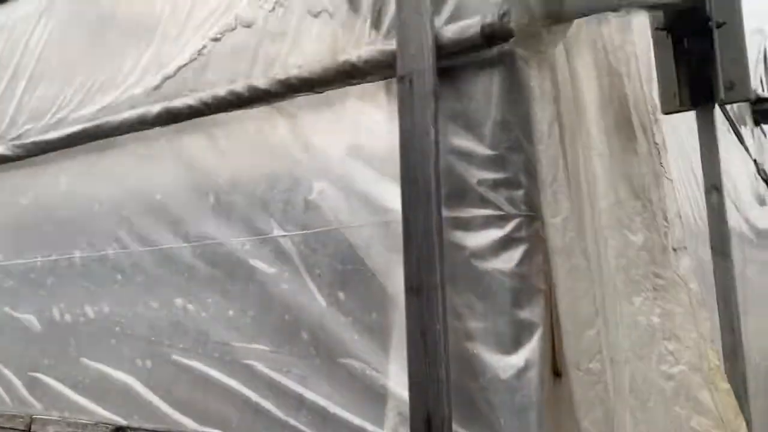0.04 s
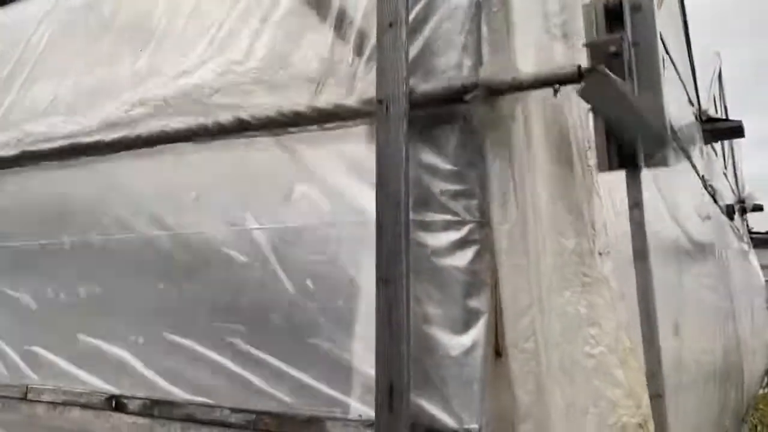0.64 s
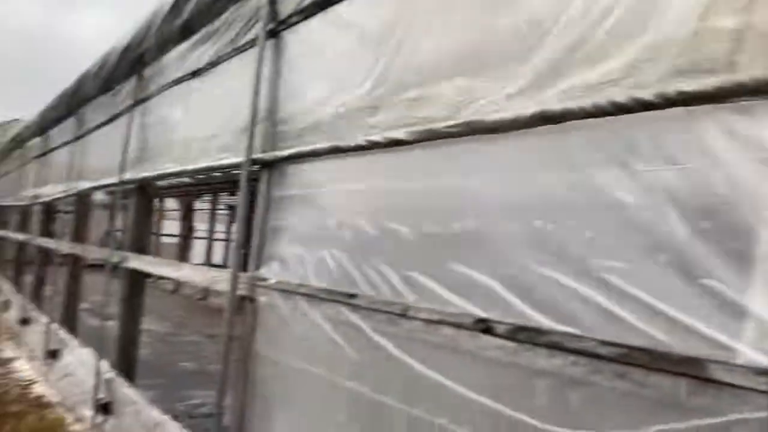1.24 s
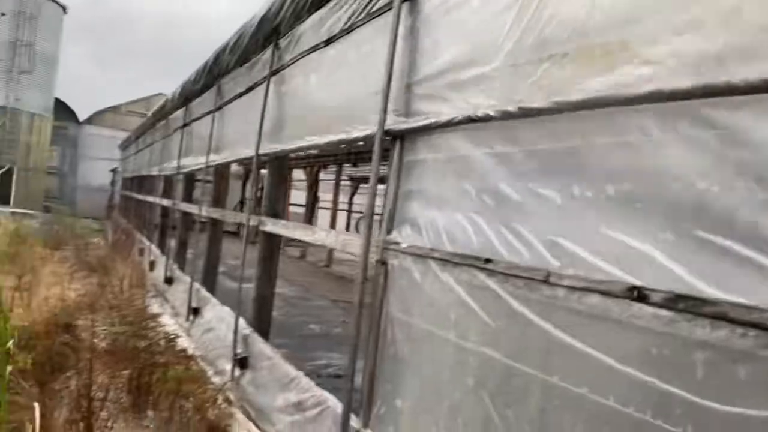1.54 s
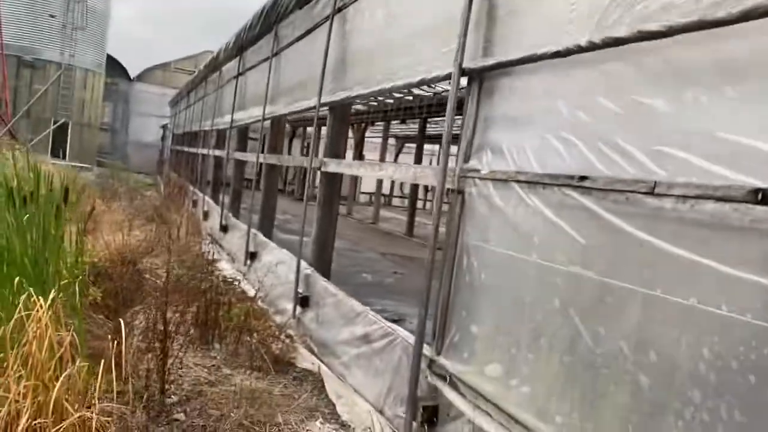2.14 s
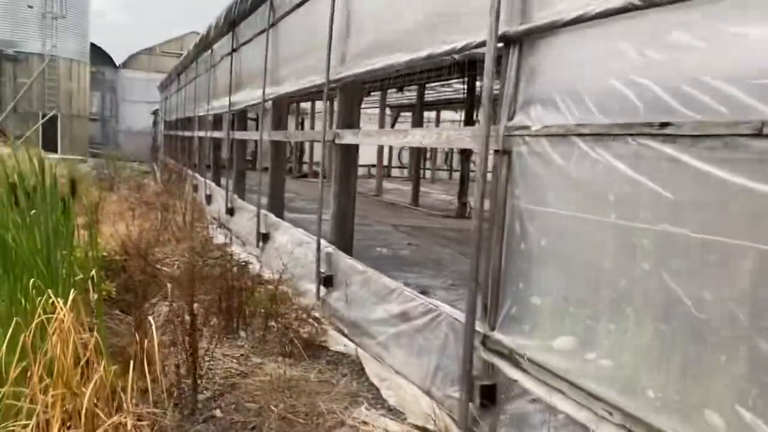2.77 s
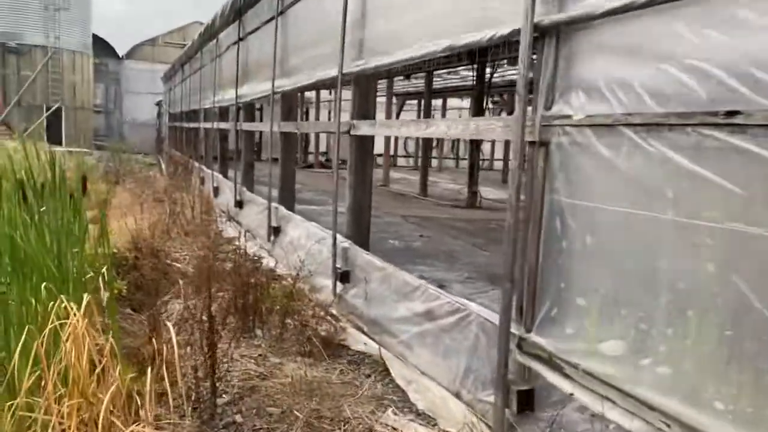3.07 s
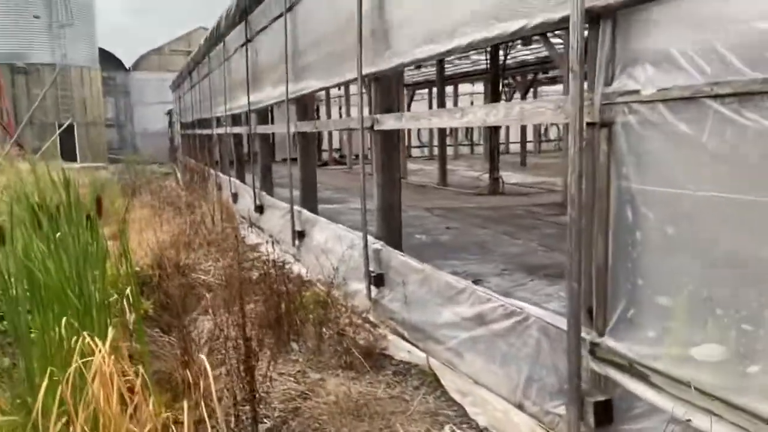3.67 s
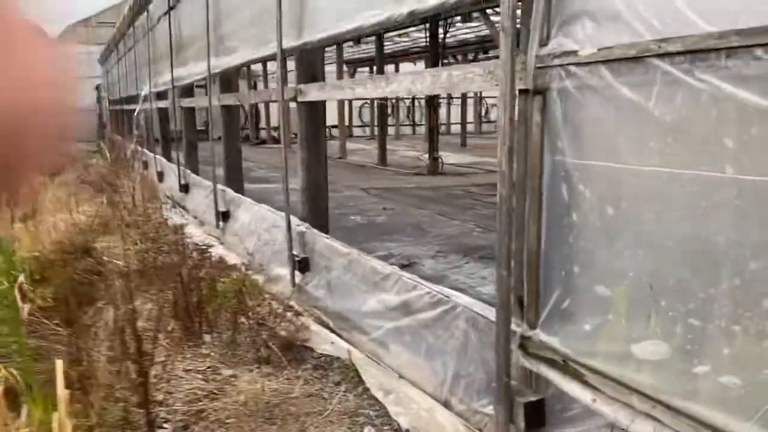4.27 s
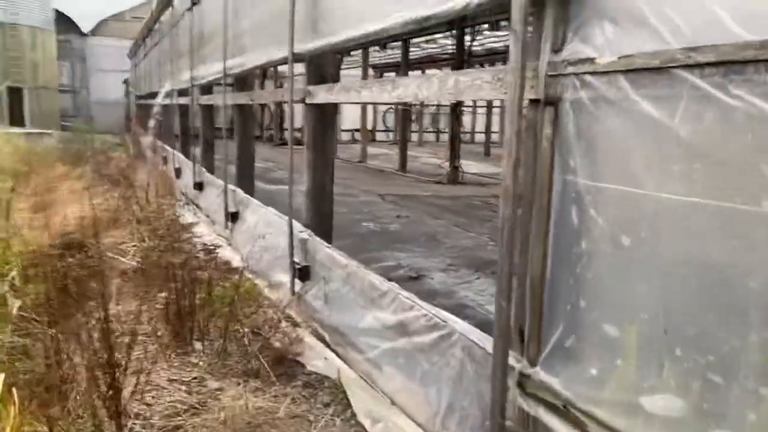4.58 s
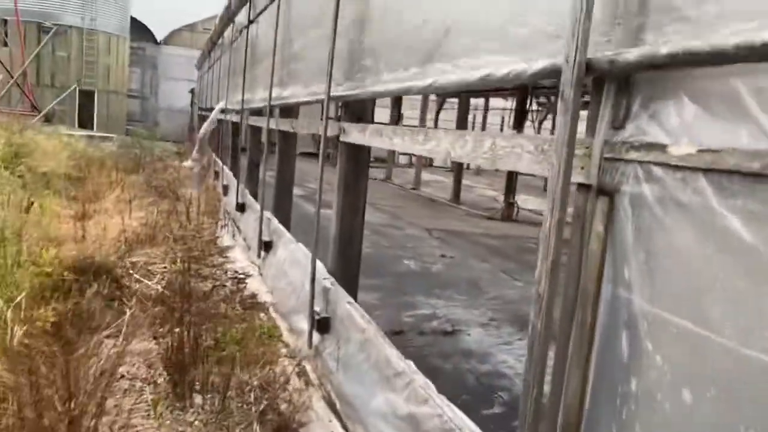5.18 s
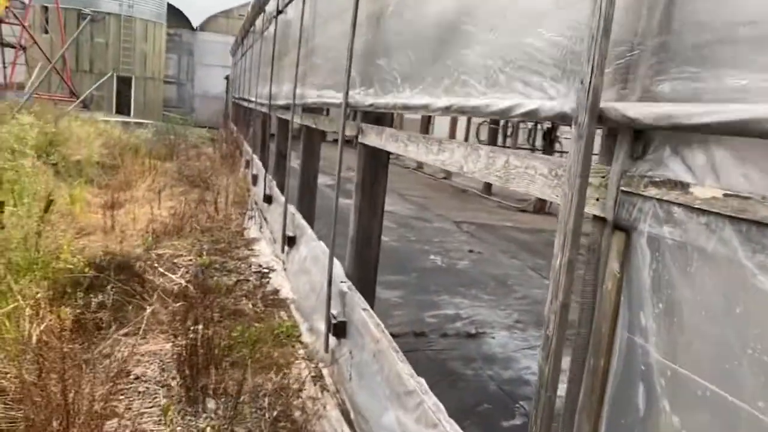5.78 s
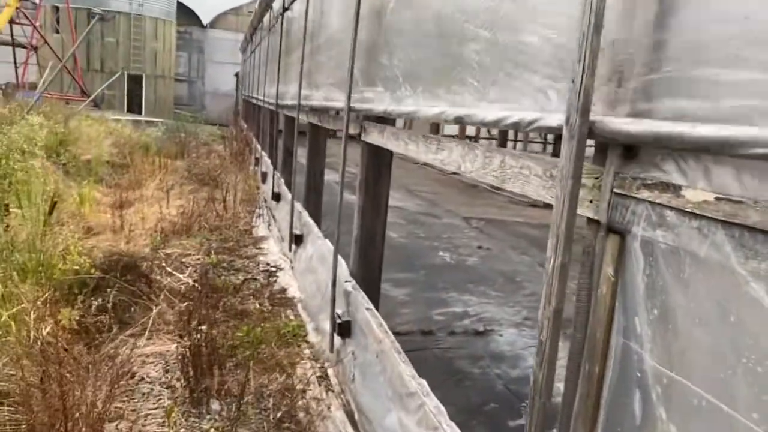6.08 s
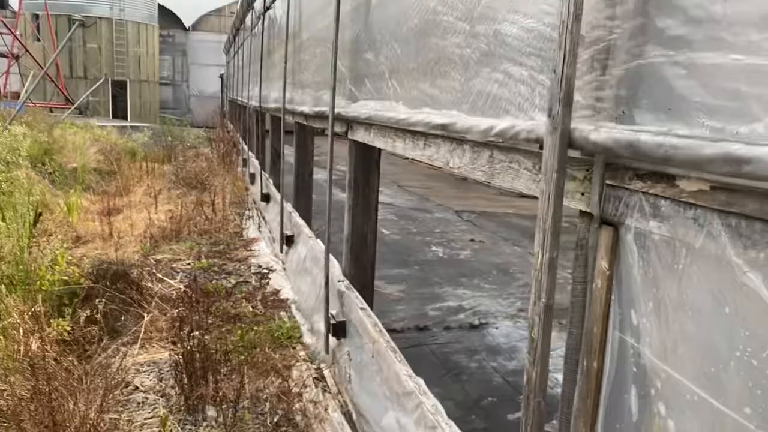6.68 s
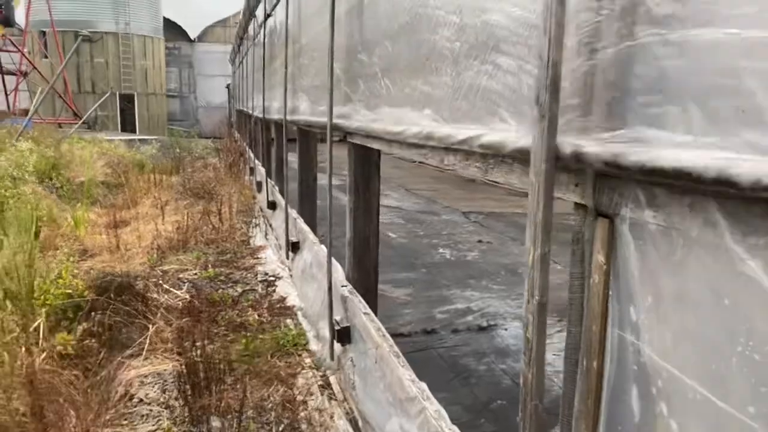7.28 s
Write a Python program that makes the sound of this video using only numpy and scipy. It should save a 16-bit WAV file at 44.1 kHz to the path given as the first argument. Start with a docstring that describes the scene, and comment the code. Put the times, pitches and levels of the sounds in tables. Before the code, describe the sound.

A rapid metallic clatter from a spinning crank gives way to uneven knocks, then quiet plastic crinkling and scraping outdoors.

```python
"""A greenhouse side curtain unrolls under its own weight and spins its hand crank, in a light wind.
For 3 s loose gears beat 7-8 times a second (lead-in, blow, rebound), ringing the gearbox and the long
steel roll pipe; the pipe chatters along the frame and the film rustles. The phone turns away from the
crank; the pipe knocks from 3 to 4.6 s. Then folds crinkle, and from 6 s the roll bumps and scrapes
over the sill."""
import sys
import numpy as np
from scipy import signal
from scipy.fft import rfft, irfft, next_fast_len
from scipy.io import wavfile
from scipy.ndimage import uniform_filter1d, map_coordinates

SR = 44100
rng = np.random.default_rng(int(sys.argv[2]) if len(sys.argv) > 2 else 0)


def generate_wav(signal):
    """Clip the signal to [-1, 1] and save it as 16-bit WAV at the path in sys.argv[1]."""
    frames = np.transpose(np.atleast_2d(signal))
    scaled = np.clip(frames, -1, 1) * 32767
    pcm = np.round(scaled).astype(np.int16)
    wavfile.write(sys.argv[1], SR, pcm)


N = 331632
TIME = np.arange(N) / SR

# gearbox modes: pitch_hz, level_db, t60_s
GEARBOX_MODES = [(571, -23, 0.1), (698, -3, 0.11), (728, 0, 0.1), (782, -9, 0.09), (888, -17, 0.08)]
# unrolling between knocks: time_s, pipe_chatter_db, film_rustle_db
UNROLLING = [(0.0, -23, -14), (.115, -25, -32), (.2, -27.5, -33), (0.38, -33.5, -31), (0.71, -28.5, -28),
             (0.98, -46, -32.5), (1.19, -36, -29), (2.14, -31, -37), (2.32, -36, -35.5), (3.2, -33, -33.5),
             (4.31, -31, -29), (4.66, -33, -37), (4.87, -38.5, -39.5), (5.08, -40, -39), (5.3, -35, -37),
             (5.75, -37, -38.5), (6.16, -31.5, -42), (6.37, -38.5, -51), (6.52, -34, -39), (6.59, -41, -50),
             (6.65, -32.5, -41), (6.7, -49, -60), (6.79, -36, -47), (7.14, -31, -43.5), (7.52, -39.5, -54)]
# gear beats: start_s, blow_db, lead_s, lead_rel_db, rebound_s, rebound_rel_db, ring_rel_db,
# grind_rel_db, tooth_crack_db
GEAR_BEATS = [(.059, -7.5, 0.029, -6.5, 0.072, -4, 4.5, -7.5, -38),
              (.214, -3.5, 0.018, -18, 0.08, -13, 0.5, -23, -19),
              (0.3649, -6, .006, -10, 0.07, -12, 3.5, -9, -12.5),
              (.501, -6.5, 0.024, -1, 0.06, -12, 5, -6.5, -13),
              (0.6328, -5.5, 0.021, -4, 0.052, -3.5, 4.5, -8, -16),
              (.762, -6.5, 0.021, -0.5, 0.05, -4.5, 8.5, -5.5, -12),
              (0.881, -5.5, 0.015, -8, 0.079, -14, 3.5, -18, -18),
              (1.0085, -3, 0.031, -13.5, 0.054, -14.5, -1, -13, -15.5),
              (1.125, -3.5, 0.025, -8, 0.069, -8, -0.5, -16, -28),
              (1.243, 0, 0.016, -21, 0.038, -27, -5, -25, -17),
              (1.3587, -3.5, 0.027, -4.5, 0.041, -9, 1, -28, -25),
              (1.473, -4.5, 0.017, -11, 0.055, -4, -4, -7, -13),
              (1.603, -4.5, 0.016, -7.5, 0.064, -12.5, 6, -5.5, -11.5),
              (1.737, -8.5, 0.015, -10, .064, -6.5, 4, -4, -15),
              (1.876, -5.5, 0.018, -6, .055, -11, 1.5, -16, -14.5),
              (2.018, -8, 0.02, -6.5, 0.051, -7.5, 2.5, -13, -17.5),
              (2.1595, -11.5, 0.025, 0, 0.061, -5, 2, -11, -31),
              (2.286, -8.5, .007, -6.5, 0.079, -9, 3.5, -22, -39),
              (2.45, -14.5, 0.023, -1, 0.066, -3.5, 5, -11, -23),
              (2.587, -9, 0.028, -8, 0.04, -9.5, 2, -27, -40),
              (2.712, -12, 0.02, 1, 0.049, -9.5, -1.5, -23, -34),
              (2.847, -9, 0.025, -4.5, 0.026, -20, -8, -21, -26)]


def undb(db):
    """Decibels to gain."""
    return np.exp(np.asarray(db) * (np.log(10) / 20))


def curves(table):
    """Columns of a timed table, one value per sample."""
    time_s, *columns = np.transpose(table)
    return [np.interp(TIME, time_s, column) for column in columns]


def unit(x, span_s=None):
    """Scale to rms 1, over the first span_s if given."""
    head = x if span_s is None else x[:int(span_s * SR)]
    return x / np.sqrt(np.mean(head ** 2) + 1e-18)


def response(colour, size=2048):
    """Minimum-phase impulse response from rows of freq_hz, level_db."""
    hz, db = np.transpose(colour)
    bins_hz = np.maximum(np.fft.rfftfreq(size, 1 / SR), 1)
    bins_db = np.interp(np.log(bins_hz), np.log(hz), db)
    cepstrum = irfft(np.log(undb(bins_db)))
    cepstrum[1:size // 2] *= 2
    cepstrum[size // 2 + 1:] = 0
    return irfft(np.exp(rfft(cepstrum)))


def varied_response(colour, scatter_db, size):
    """Impulse response of a colour with each point randomly raised or lowered."""
    hz, db = np.transpose(colour)
    return response(np.transpose([hz, db + scatter_db * rng.standard_normal(len(hz))]), size)


def through(x, ir):
    """Convolve, keeping the length of x."""
    size = next_fast_len(len(x) + len(ir), True)
    spectrum = rfft(x.astype(np.float32), size) * rfft(ir.astype(np.float32), size)
    return irfft(spectrum, size)[:len(x)].astype(float)


def shelf(x, hz, db):
    """Raise or lower everything above hz."""
    low = signal.sosfiltfilt(signal.butter(3, hz, fs=SR, output="sos"), x)
    return low + undb(db) * (x - low)


def walk(rate_hz):
    """Slow random wander, rms 1."""
    hop = int(SR / rate_hz)
    steps = np.repeat(rng.standard_normal(N // hop + 1), hop)
    return unit(uniform_filter1d(steps, hop)[:N])


def add(track, start_s, sound):
    """Mix a sound into a track."""
    i = min(max(int(start_s * SR), 0), N)
    track[i:i + len(sound)] += sound[:N - i]


def crunch(t, rise_s, decay_s, tail_db, tail_s, strikes=((0, 0),)):
    """Faces meet unevenly at each strike; the frame carries on a weak shiver."""
    power = (undb(tail_db) * (1 - np.exp(-t / rise_s)) * np.exp(-t / tail_s)) ** 2
    for start_s, db in strikes:
        age_s = np.maximum(t - start_s, 0)
        power = power + (undb(db) * (1 - np.exp(-age_s / rise_s)) * np.exp(-age_s / decay_s)) ** 2
    uneven_db = 2.5 * unit(uniform_filter1d(rng.standard_normal(len(t)), size=110))
    return np.sqrt(power) * undb(uneven_db) * rng.standard_normal(len(t))


def bounces(gap_s=0.0055, step_db=-5):
    """Steel strikes three times per knock: start_s, level_db."""
    first_s, second_s = gap_s * rng.uniform(0.6, 1.4, 2)
    return [(0, 0), (first_s, step_db), (first_s + second_s, 2 * step_db)]


def ring(t, modes, rise_s, scatter_db, detune):
    """Damped modes; each blow lands elsewhere and weights them anew."""
    hz, db, t60_s = np.transpose(modes)[:, :, None]
    weight, shift, phase = rng.standard_normal((3, len(modes), 1))
    waves = np.sin(2 * np.pi * (hz * (1 + detune * shift) * t + phase))
    decay = np.exp(-np.minimum(np.log(1000) * t / t60_s, 20))
    return (undb(db + scatter_db * weight) * waves * decay).sum(0) * (1 - np.exp(-t / rise_s))


def ticks(rate_hz, decay_s, hiss, spread_db=3.5):
    """Small contacts of uneven size, each a noise burst, over a smooth rub."""
    size = undb(spread_db * np.minimum(rng.exponential(size=N), 2))
    hits = size * (rng.random(N) < rate_hz / SR)
    power = np.abs(signal.lfilter([1], [1, -np.exp(-2 / (decay_s * SR))], hits ** 2))
    return (unit(np.sqrt(power)) + hiss) * rng.standard_normal(N) / (1 + hiss)


def roaming(x, colour, scatter_db, count):
    """Recolour a sound piece by piece as the contact moves along the roll."""
    out, hop = np.zeros(N), N // count
    fade = signal.windows.hann(2 * hop, sym=False)
    padded = np.pad(x, (hop, 2 * hop))
    for start in range(0, N + hop, hop):
        piece = padded[start:start + 2 * hop]
        ir = varied_response(colour, scatter_db, size=1024)
        piece = signal.fftconvolve(piece * fade[:len(piece)], ir / np.linalg.norm(ir))
        add(out, (start - hop) / SR, piece[max(hop - start, 0):])
    return unit(out)


def blows():
    """Stray knocks and gear beats: start_s, level_db, ring_rel_db, grind_rel_db, snap_rel_db."""
    # extra gear rattles at first, then the pipe against the frame: start_s, level_db, snap_rel_db
    stray_knocks = [(0.001, -11, -2), (.141, -10, -11), (0.172, -17, 9), (0.233, -8, 9), (.489, -9, 0),
                    (.777, -15, -1), (1.231, -24, -7), (1.267, -11, 11.5), (1.83, -27, -8),
                    (2.213, -14.5, 2), (2.228, -18, 10), (2.862, -13, 6), (2.956, -12.5, 1),
                    (2.999, -20.5, 8), (3.021, -15.5, -8), (3.064, -14.5, 2), (3.102, -16, -12),
                    (3.178, -12.5, -10), (3.247, -13.5, -1), (3.255, -12.5, 6.5), (3.327, -11, -4),
                    (3.405, -12.5, -7), (3.456, -17, -5), (3.481, -12.5, -2), (3.533, -39, -7),
                    (3.565, -15.5, 5.5), (3.614, -15, -2), (3.641, -10, -9), (3.727, -18.5, 2),
                    (3.796, -11, -3), (3.884, -17, 5), (3.948, -16.5, 9.5), (4.047, -20, 11),
                    (4.099, -15, 6), (4.185, -15, 12), (4.222, -12.5, 12), (4.239, -8, 5.5), (4.33, -19, 9),
                    (4.373, -13, -5), (4.393, -10, -4), (4.474, -8.5, -2), (4.533, -15, 2), (4.554, -18, 6)]
    glance = (-0.5, -28)  # ring_rel_db, grind_rel_db
    glance_snap_db = -0.5
    rows = [(s, db, *glance, snap_db) for s, db, snap_db in stray_knocks]
    for s, db, lead_s, lead_db, rebound_s, rebound_db, ring_db, grind_db, _ in GEAR_BEATS:
        rows += [(s - lead_s, db + lead_db, *glance, glance_snap_db),  # slack closes
                 (s, db, ring_db, grind_db, 0),
                 (s + rebound_s, db + rebound_db, *glance, glance_snap_db)]  # gear falls back
    return rows


def knocks():
    """Gear and pipe knocks: dry snap, clack with steel clink, clank along the pipe, hollow gearbox."""
    # contact colours: freq_hz, level_db
    snap_colour = [(6000, -16), (7400, 3.5), (8600, -1.5), (10000, 0.5), (11000, 0), (11800, -44),
                   (13200, 0), (14200, -11), (16000, -35)]
    clack_colour = [(1800, -39), (3000, -34), (3500, -7.5), (4100, 2), (4600, -6.5), (4950, -7.5),
                    (5400, 2.5), (5800, -0.5), (6400, 2), (7400, -7), (8600, -13.5), (10500, -2),
                    (12000, -26), (16000, -31)]
    clank_colour = [(90, -24), (170, -10.5), (250, -19), (340, -7.5), (520, -1), (700, 0.5), (1000, 1.5),
                    (1420, 4.5), (1650, -0.5), (1950, -1), (2250, -11.5), (2800, -10), (3300, -9.5),
                    (4500, -30.5)]
    # modes of small crank parts and roll pipe: pitch_hz, level_db, t60_s
    clink_modes = [(3930, -54, 0.011), (4200, 8, 0.015), (4750, 19, 0.023), (5230, 13, 0.025),
                   (5870, 8, 0.012), (6820, -13, 0.011), (8000, -36, 0.015)]
    pipe_modes = [(309.5, -5.5, 0.22), (1380, -7, 0.03), (1540, -42, 0.11), (1930, 3, 0.029),
                  (1922, 12.5, 0.057), (2024, 3.5, 0.18), (2147, 6.5, 0.081), (2444, 11, 0.023),
                  (2700, -1, 0.11), (3020, -11, 0.25)]
    # mix as the phone leaves the crank for the pipe:
    # time_s, pipe_rel_db, clink_rel_db, rattle_ms, clank_rel_db, gearbox_rel_db
    balance = [(0, -55, 3, 2.8, -8, -12), (1.2, 2.5, -3.5, 1.7, -18.5, -15.5),
               (2.0, -15.5, -22, 5.3, -9.5, -16), (2.6, 1, -15, 4.1, -13.5, -13),
               (3.2, 1.5, -1, 7.3, -13.5, -26.5), (4.25, 4, -12, 12, -15.5, -44),
               (4.48, -1.5, -3, 11, -15, -28.5)]
    out, t = np.zeros(N), np.arange(SR // 7) / SR
    snap_ir, mix, chatter_db = response(snap_colour), np.array(curves(balance)), curves(UNROLLING)[0]
    for start_s, db, ring_db, grind_db, snap_rel_db in blows():
        i = max(int(start_s * SR), 0)
        pipe_db, clink_db, rattle_ms, clank_rel_db, box_rel_db = mix[:, i]
        clack_gain, clank_gain = undb(db - 14.5), undb(db + clank_rel_db)
        box_gain = undb(db + box_rel_db + ring_db)
        firm_db = 0.06 * (db - chatter_db[i] - 31)  # further above the chatter: brighter
        snap_gain = undb(db - 16 + snap_rel_db + firm_db + 2 * rng.standard_normal())
        rattle_s, strikes = rattle_ms / 1000, bounces()
        clack_ir = varied_response(clack_colour, scatter_db=3.5, size=512)
        clank_ir = varied_response(clank_colour, scatter_db=2.5, size=1024)

        snap = crunch(t, 0.0004, 0.5 * rattle_s, tail_db=-26, tail_s=0.018, strikes=strikes)
        snap = unit(through(snap, snap_ir), 0.014)
        clack = crunch(t, 0.00015, 0.7 * rattle_s, tail_db=-15, tail_s=0.025, strikes=strikes)
        clink = ring(t, clink_modes, rise_s=0.00041, scatter_db=5, detune=0.025)
        clack = unit(through(clack, clack_ir), 0.019) + undb(clink_db) * unit(clink, 0.01)
        clank = crunch(t, 0.0024, 2 * rattle_s, tail_db=-18.5, tail_s=0.067)
        pipe = ring(t, pipe_modes, rise_s=0.0002, scatter_db=5, detune=0.04)
        clank = unit(through(clank, clank_ir), 0.022) + undb(pipe_db) * unit(pipe, 0.012)
        box = unit(ring(t, GEARBOX_MODES, rise_s=0.0047, scatter_db=4, detune=0.02), 0.037)
        add(out, start_s, snap_gain * snap + clack_gain * clack + clank_gain * clank + box_gain * box)

        # teeth grind up to the blow: a reversed burst
        burst = rng.standard_normal(len(t)) * np.exp(-t / 0.0058)
        grind = clack_gain * unit(through(burst, clack_ir), 0.05)
        grind += clank_gain * unit(through(burst, clank_ir), 0.035)
        swell = grind[:np.clip(i, 1, SR // 30)][::-1]
        add(out, start_s - len(swell) / SR, undb(grind_db) * swell)
    return out


def shaking(depth_db=4.5, settle_s=0.035):
    """Gain of pipe and film: each knock shakes them, then they settle."""
    jolt, t = np.zeros(N), np.arange(SR // 5) / SR
    for start_s, *_ in blows():
        add(jolt, start_s, np.exp(-t / settle_s))
    jolt = np.minimum(jolt, 1)
    return undb(depth_db * (jolt - uniform_filter1d(jolt, size=SR // 2)))


def curtain():
    """The roll pipe chatters along the posts; stiff film crackles off it."""
    # pipe and film colours: freq_hz, level_db
    chatter_colour = [(120, -10.5), (300, -1.5), (560, -11), (715, 3.5), (830, -13.5), (1100, -9.5),
                      (1420, 2), (1550, -4.5), (1720, 3.5), (2080, 0.5), (2260, -5.5), (2750, -9.5),
                      (3400, -17.5), (5000, -22.5)]
    film_colour = [(1800, -5), (2900, 0.5), (3400, -4), (3800, 1), (4500, -3), (4950, 1), (5500, 4.5),
                   (6100, 0), (7500, 0), (10000, 2.5), (12000, -7.5), (13500, -35), (16000, -58)]
    chatter_db, film_db = curves(UNROLLING)
    contacts = ticks(rate_hz=190, decay_s=0.0068, hiss=0.13)
    chatter = roaming(contacts, chatter_colour, scatter_db=1.5, count=70)
    crackle = ticks(rate_hz=230, decay_s=0.003, hiss=0.16, spread_db=4)
    film = roaming(crackle, film_colour, scatter_db=2.5, count=90)
    return shaking() * (undb(chatter_db) * chatter + undb(film_db) * film)


def wind(breeze_db=-50.5, hush_db=-49):
    """Breeze, gusts and short eddies rumble on the phone over an open-air hush."""
    # rumble and hush colours: freq_hz, level_db
    rumble_colour = [(20, -40), (45, -1), (75, 0), (110, 1), (170, -9.5), (300, -29), (700, -32),
                     (2000, -56)]
    hush_colour = [(30, -36), (100, -1), (300, -10.5), (1000, -9), (4000, -20), (10500, -35.5),
                   (15000, -57)]
    # broad gusts: centre_s, level_db, half_width_s
    gusts = [(1.151, -45.5, 0.4), (5.93, -41.5, 0.44)]
    # eddies on the case: start_s, level_db
    eddies = [(4.668, -46), (4.799, -41.5), (5.659, -39), (5.69, -41), (5.919, -38), (5.955, -36),
              (6.038, -35), (6.21, -34.5), (6.4, -37.5), (7.442, -32.5)]
    gust_power = sum(undb(db) ** 2 * np.exp(-((TIME - s) / width_s) ** 2) for s, db, width_s in gusts)
    flow = np.sqrt(undb(breeze_db) ** 2 + gust_power)
    rumble_ir, hush_ir = response(rumble_colour), response(hush_colour)
    mid, side = (unit(through(rng.standard_normal(N), rumble_ir)) for _ in range(2))
    rumble = (mid + undb(-20) * np.array([side, -side])) * flow * undb(4.2 * walk(rate_hz=14))
    buffets, t = np.zeros(N), np.arange(SR // 5) / SR
    for start_s, db in eddies:
        eddy = through(rng.standard_normal(len(t)) * t * np.exp(-t / 0.0056), rumble_ir)
        add(buffets, start_s, undb(db) * unit(eddy, 0.04))
    left, right, common = (unit(through(rng.standard_normal(N), hush_ir)) for _ in range(3))
    return rumble + buffets + undb(hush_db) * (common + 0.5 * np.array([left, right]))


def pawl():
    """The lifted pawl flicks passing teeth: dry clicks, too light to ring the gearbox."""
    # flicks: start_s, level_db
    flicks = [(.032, -12.5), (.197, -21), (.431, -22), (.591, -29), (.72, -31), (.858, -16), (1.044, -25),
              (1.1, -30), (1.143, -17), (1.5, -28), (1.801, -17), (2.182, -30), (2.976, -27), (2.999, -23),
              (3.469, -19), (3.767, -21), (3.925, -24), (4.519, -30)]
    # flick colour: freq_hz, level_db
    colour = [(1500, -14), (3200, -16), (4400, -4), (5800, -6), (7300, 0), (8700, -3), (10300, 0),
              (11900, -16), (13400, -3), (16000, -22)]
    out, t = np.zeros(N), np.arange(SR // 20) / SR
    for start_s, db in flicks:
        burst = crunch(t, rise_s=0.0003, decay_s=0.0025, tail_db=-22, tail_s=0.008)
        click = through(burst, varied_response(colour, scatter_db=2, size=256))
        add(out, start_s, undb(db) * unit(click, 0.004))
    return out


def teeth():
    """On each main blow a steel tooth seats with a short, bright crack."""
    # crack colour: freq_hz, level_db
    colour = [(5000, -43), (10500, 11), (11800, -11), (13000, 8), (13800, 6), (15000, -8), (16000, -26)]
    out, t = np.zeros(N), np.arange(SR // 14) / SR
    for start_s, *_, crack_db in GEAR_BEATS:
        burst = crunch(t, rise_s=0.0002, decay_s=0.0025, tail_db=-26, tail_s=0.008, strikes=bounces())
        crack = through(burst, varied_response(colour, scatter_db=2.5, size=256))
        add(out, start_s, undb(crack_db) * unit(crack, 0.0033))
    return out


def handle(t60_s=0.0064):
    """The loose handle chinks in its steel socket and rings briefly."""
    # chinks: start_s, level_db, pitch_hz
    chinks = [(.0595, -20, 4060), (.269, -17, 4740), (0.4783, -15, 4390), (0.503, -8, 5020),
              (0.682, -19.5, 4340), (0.742, -17, 4680), (0.763, -11.5, 4900), (1.4755, -15, 3690),
              (3.259, -22, 4130), (3.952, -25, 2580)]
    # chink partials: pitch_ratio, level_db
    partials = [(.9, -20), (1, -4), (1.07, 6), (1.25, -9)]
    out, t = np.zeros(N), np.arange(SR // 14) / SR
    for start_s, db, pitch_hz in chinks:
        modes = [(pitch_hz * ratio, mode_db, t60_s) for ratio, mode_db in partials]
        chink = ring(t, modes, rise_s=0.0004, scatter_db=2, detune=0.012)
        add(out, start_s, undb(db) * unit(chink, 0.006))
    return out


def folds(cracks_per_s=800, crack_s=0.0003, rub=0.8):
    """Folds of stiff film buckle, each a quick run of tiny cracks."""
    # buckling folds: start_s, level_db, decay_s
    crinkles = [(4.674, -31.5, 0.0087), (4.718, -27.5, 0.027), (4.737, -28, 0.012), (4.779, -29.5, 0.0073),
                (4.854, -33.5, 0.003), (4.8953, -19.5, 0.019), (4.912, -36, 0.012), (4.929, -21, 0.013),
                (4.974, -29.5, 0.0047), (5.023, -29, 0.0074), (5.067, -31.5, 0.005), (5.119, -25, 0.022),
                (5.152, -27.5, 0.005), (5.216, -26.5, 0.0058), (5.253, -30.5, 0.023), (5.312, -31, 0.021),
                (5.421, -34, 0.0024), (5.447, -29.5, 0.0052), (5.475, -28, .007), (5.496, -30, 0.0046),
                (5.518, -31, 0.0062), (5.558, -32, .008), (5.672, -33, .004), (5.689, -31.5, 0.0044),
                (5.779, -40, .005), (5.852, -34, .004), (5.876, -35, .004), (5.895, -35, 0.0041),
                (5.925, -33, .006), (6.026, -32, 0.0033), (6.471, -40, .004), (6.519, -40, .004),
                (6.537, -38, 0.0037), (6.722, -39, 0.005)]
    # fold colour: freq_hz, level_db
    colour = [(200, -23), (600, -3.5), (1100, -6.5), (1700, 5), (2400, -4), (3300, -8.5), (4400, -8),
              (5400, 3), (6500, -7), (8000, -11), (11000, -9), (15000, -15)]
    out, t = np.zeros(N), np.arange(SR // 7) / SR
    for start_s, db, decay_s in crinkles:
        cracks = rng.random(len(t)) < cracks_per_s / SR
        cracks[0] = True
        crack_power = signal.lfilter([1], [1, -np.exp(-1 / (crack_s * SR))], cracks)
        grain = np.sqrt(crack_power + rub ** 2)
        burst = grain * crunch(t, rise_s=0.0002, decay_s=decay_s, tail_db=-36, tail_s=0.025)
        crinkle = through(burst, varied_response(colour, scatter_db=1.8, size=512))
        add(out, start_s, undb(db) * unit(crinkle, 0.01))
    return out


def sill_bumps():
    """The film-padded roll lands on the sill board in broad crunches; the gearbox answers."""
    # landings: start_s, level_db, decay_s, ring_rel_db
    landings = [(5.989, -29, 0.0076, -12), (6.094, -24.5, 0.02, -10), (6.213, -25, 0.01, -12.5),
                (6.231, -22.5, 0.022, -8), (6.274, -27.5, 0.048, -16), (6.398, -29, 0.0035, -9),
                (6.413, -27, 0.0065, -18), (6.602, -21.5, 0.01, -11), (6.723, -31.5, 0.016, -8),
                (6.812, -21.5, 0.021, -10.5), (6.847, -24, 0.019, -3.5), (7.026, -25.5, 0.035, -10),
                (7.055, -25, 0.0087, -4.5), (7.281, -28, 0.0039, -7), (7.352, -30.5, 0.014, -3.5)]
    # landing colour: freq_hz, level_db
    colour = [(150, -21), (350, -2), (560, -9), (720, -15), (870, -8), (1150, -6), (1530, 3.5),
              (2100, -0.5), (2400, -4), (2700, 3), (3150, -10.5), (4600, -16), (5100, -7.5), (6400, -18.5),
              (10000, -15), (14000, -20)]
    out, t = np.zeros(N), np.arange(SR // 6) / SR
    for start_s, db, decay_s, ring_db in landings:
        burst = crunch(t, rise_s=0.00087, decay_s=decay_s, tail_db=-16, tail_s=0.048)
        thud = unit(through(burst, varied_response(colour, scatter_db=1.5, size=1024)), 0.016)
        box = unit(ring(t, GEARBOX_MODES, rise_s=0.0088, scatter_db=2.5, detune=0.01), 0.035)
        add(out, start_s, undb(db) * (thud + undb(ring_db) * box))
    return out


def sill_scrapes(rise_s=0.032):
    """The roll drags over the sill; each drag bites quickly and dies away."""
    # drags: peak_s, level_db, decay_s
    drags = [(6.25, -36, 0.07), (6.825, -30.5, 0.06), (7.04, -32, 0.024), (7.14, -29.5, 0.05)]
    # scrape colour: freq_hz, level_db
    colour = [(1500, -13.5), (2200, -15), (2450, -3.5), (2680, -4.5), (2950, -3.5), (3300, -14),
              (4200, -24), (7000, -32)]
    pressure = sum(undb(db) * np.exp(-np.maximum((peak_s - TIME) / rise_s, (TIME - peak_s) / decay_s))
                   for peak_s, db, decay_s in drags)
    contacts = ticks(rate_hz=130, decay_s=0.0048, hiss=0.17)
    return pressure * unit(through(contacts, response(colour)))


def wall(x, decay_s, count):
    """Early scatter off sheeted wall and posts, changing as the phone moves; lows pass the film."""
    t = np.arange(SR // 8) / SR
    highs = signal.sosfilt(signal.butter(2, 900, "high", fs=SR, output="sos"), x)
    out, hop = np.zeros((2, N)), N // count
    for start in range(0, N, hop):
        for side in out:
            ir = rng.standard_normal(len(t)) * np.exp(-t / decay_s)
            add(side, start / SR, signal.fftconvolve(highs[start:start + hop], ir / np.linalg.norm(ir)))
    return out


def scene():
    """The mechanism slips behind the phone: top treble shaded, left side later."""
    # crank bearing: time_s, left_lag_ms, left_minus_right_db, treble_shade_db
    bearing = [(0, 0.018, 0.5, -0.5), (.8, 0.047, 0.5, -5), (1.3, 0.24, 1, -8), (1.9, 0.46, 3, -5),
               (2.8, 0.37, -0.5, -3.5), (3.3, 0.4, 2, -11), (4.5, 0.395, 7.5, -16.5), (5.0, 0.16, 11, -23),
               (5.7, 0.19, 6, -25), (7.5, 0.17, 8, -19)]
    # left microphone against right: freq_hz, gain_db
    left_colour = [(100, 2.5), (620, -3.5), (1200, -0.5), (4500, 4), (8000, -5), (14000, -8)]
    lag_ms, pan_db, shade_db = curves(bearing)
    source = knocks() + teeth() + pawl() + handle() + curtain() + sill_scrapes() + folds() + sill_bumps()
    late = map_coordinates(source, [np.arange(N) - lag_ms * SR / 1000], order=3)
    direct = undb(-4) * np.array([through(late, response(left_colour)), source])
    scatter = undb(-7.5) * wall(source, decay_s=0.007, count=24)
    shaded = shelf(direct + scatter, hz=7100, db=shade_db)
    # the phone's body favours one side only for short waves
    return shelf(shaded, hz=1660, db=np.array([pan_db, -pan_db]) / 2) + wind()


def record(dry):
    """The phone rounds the highest peaks and cuts the top."""
    top_hz = 15800
    return signal.sosfilt(signal.ellip(8, 0.2, 70, top_hz, fs=SR, output="sos"), np.tanh(dry))


dry = scene()
out = record(dry)
generate_wav(out)
```